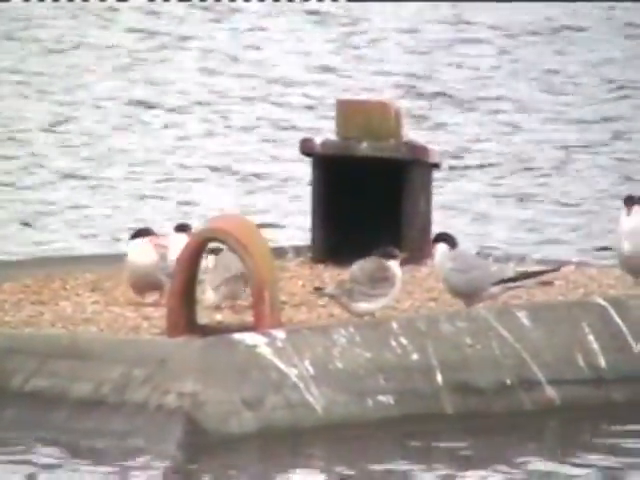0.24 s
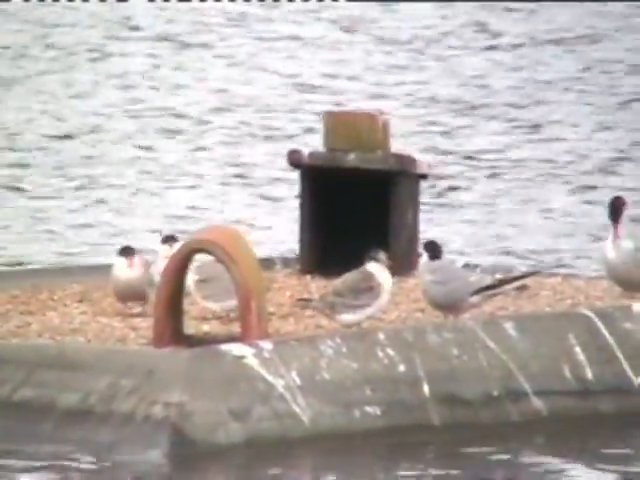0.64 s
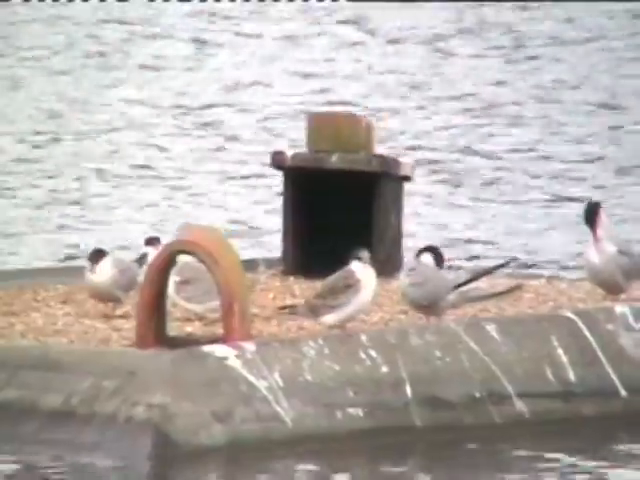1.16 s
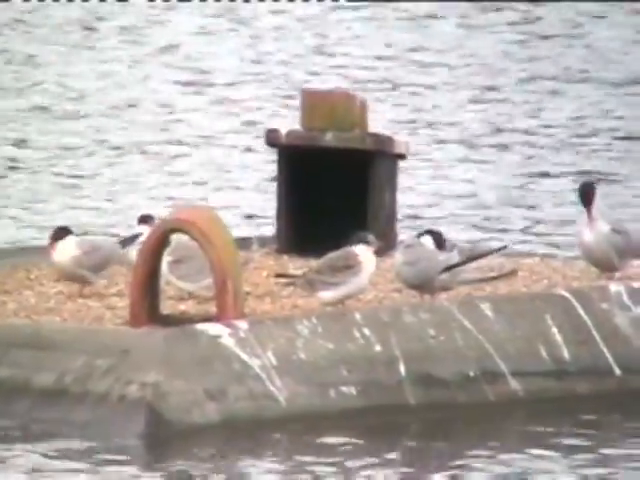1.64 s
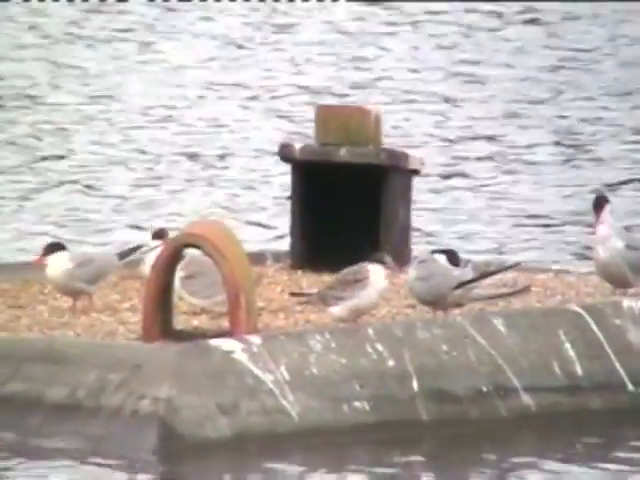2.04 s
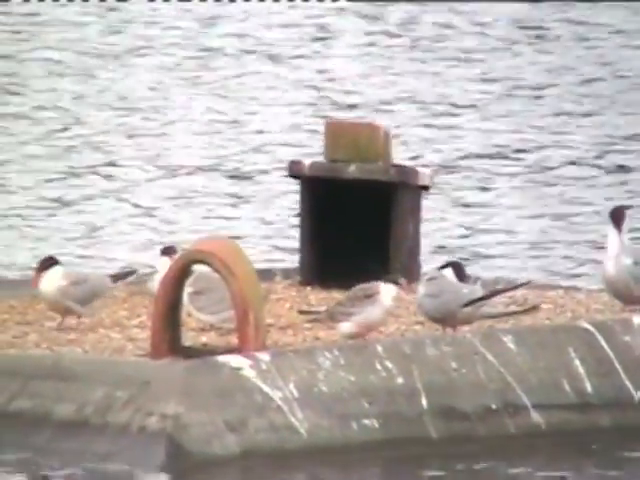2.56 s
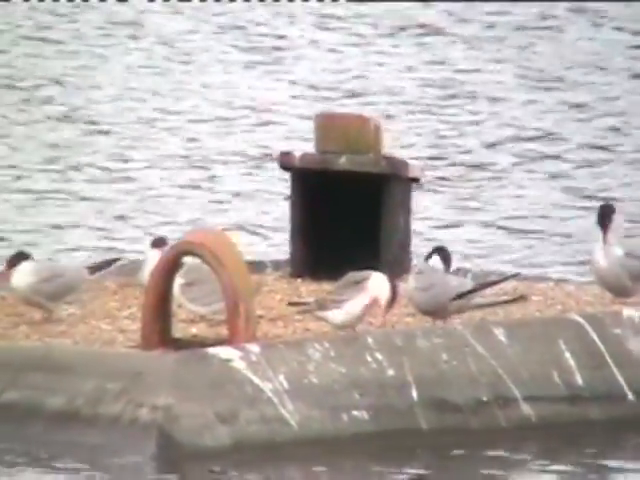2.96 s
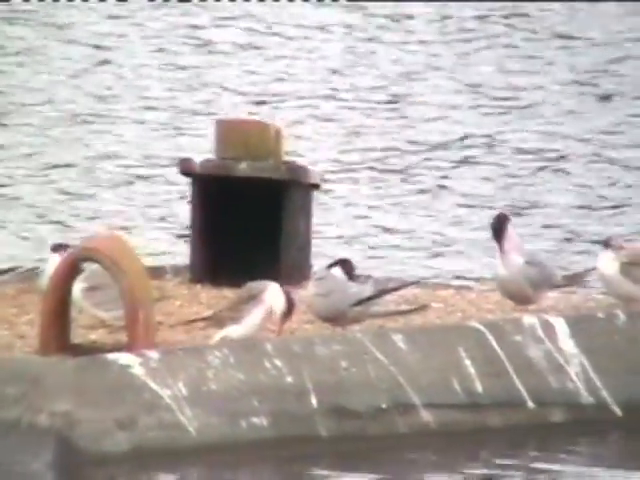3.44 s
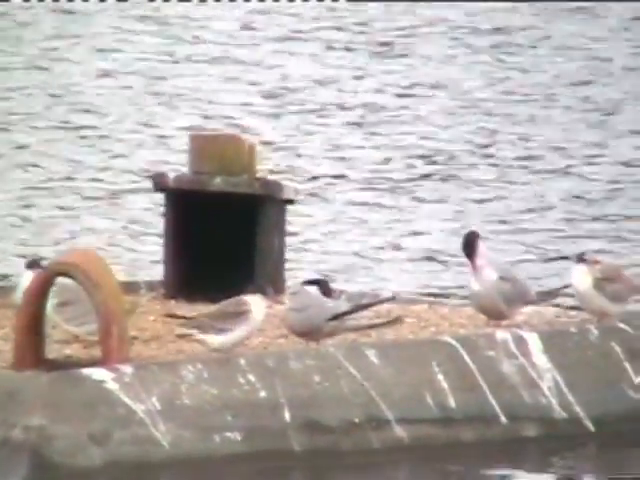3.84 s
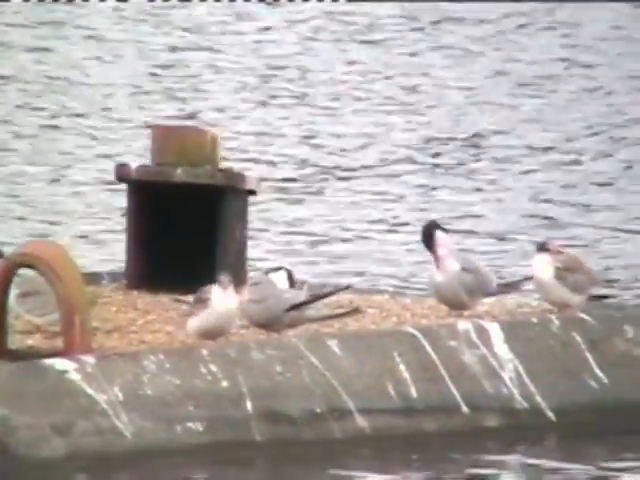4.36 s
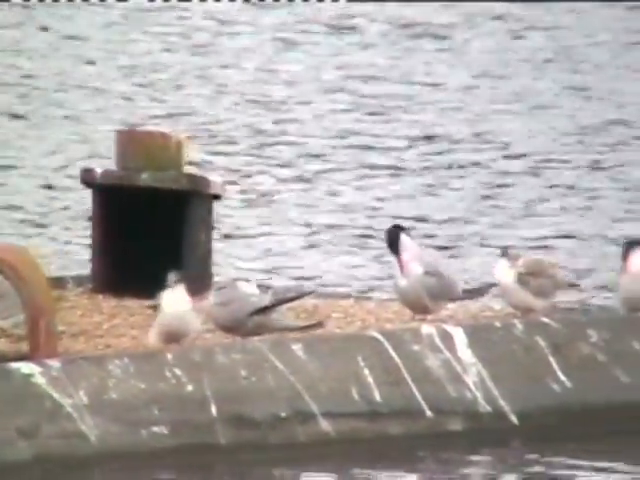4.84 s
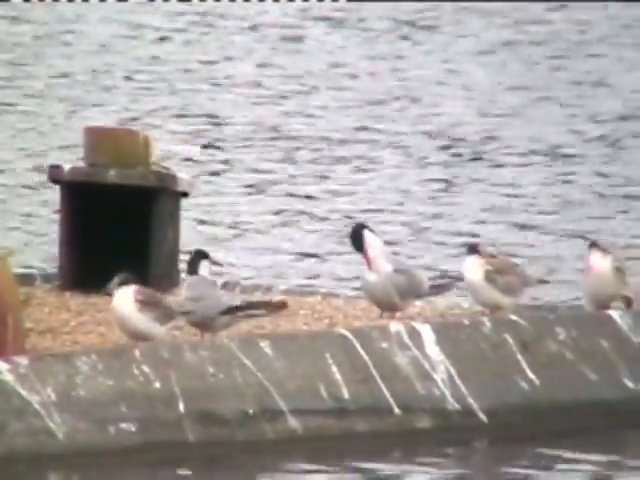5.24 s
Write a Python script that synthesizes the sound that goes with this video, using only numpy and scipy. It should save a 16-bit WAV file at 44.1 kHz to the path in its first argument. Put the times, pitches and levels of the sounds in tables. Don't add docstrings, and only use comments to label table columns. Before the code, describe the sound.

Outdoor seabird calls over continuous hissing wind and a faint high motor whine. Fast buzzy churring opens, with tiny whistles and long falling cries farther off. It thins out to distant rasps, then scolding birds grate over each other, followed by a near trilled call with a rough low ending. More thin whistles and rasps lead to a second similar call at the close. Open water gives only faint scattered returns; close stereo microphones, limited treble.

```python
import sys
import numpy as np
from scipy import signal
from scipy.fft import rfft, irfft, next_fast_len
from scipy.io import wavfile
from scipy.ndimage import uniform_filter1d

SR = 44100
rng = np.random.default_rng(int(sys.argv[2]) if len(sys.argv) > 2 else 0)


def master(y):
    cut = np.clip(np.atleast_2d(y).T, -1, 1)
    pcm = np.round(cut * 32767)
    wavfile.write(sys.argv[1], SR, pcm.astype(np.int16))


def invert_db(level):
    return 10 ** (np.asarray(level, dtype=float) / 20)


N = 242991


def read(points, hz):
    f, value = np.transpose(points)
    return np.interp(np.log(hz + 1), np.log(f + 1), value)


def evened(x):
    return x / np.sqrt(np.mean(x ** 2) + 1e-20)


def add(mix, s, sound):
    part = mix[max(round(s * SR), 0):][:len(sound)]
    part += sound[:len(part)]


def wander(count, span):
    wide = int(span) + 1
    return evened(uniform_filter1d(uniform_filter1d(rng.standard_normal(count), wide), wide))


def wind():
    # (frequency [Hz], density [dB per Hz])
    spectrum = [(18, -72.5), (30, -30.5), (139, -23.5), (197, -14), (307, -6), (361, -4), (415, -7.5),
                (445, -4.5), (700, -5), (1000, -9), (1250, -11), (1500, -13), (1970, -11.5), (2110, -15),
                (2260, -15), (2500, -19.5), (3210, -20), (3700, -20), (4100, -13), (4600, -11.5),
                (4900, -17), (5200, -15.5), (5700, -9.5), (7760, -30.5), (10100, -72), (17100, -120)]
    # (frequency [Hz], port likeness [0-1])
    likeness = [(60, .25), (125, .75), (200, .7), (300, .28), (500, .45), (1000, .78), (2000, .84),
                (4000, .94), (6300, .9), (7000, .5)]
    frames, hz = N // 256 + 5, np.fft.rfftfreq(1024, 1 / SR)
    a, b, c, d, patches = rng.standard_normal((frames, 513, 5)).T
    patches = evened(uniform_filter1d(uniform_filter1d(patches, 12, 0), 14, 1))
    same = np.clip(read(likeness, hz), 0, 1)[:, None]
    left = a + 1j * b
    right = same * left + np.sqrt(1 - same ** 2) * (c + 1j * d)
    z = np.array([left, right]) * invert_db(read(spectrum, hz)[:, None] + .8 * patches)
    hiss = signal.istft(z, nperseg=1024, noverlap=768)[1][:, :N]
    return invert_db(-46.5) * evened(hiss)


def steady_tones(tones, waver_share):
    motor_db = 4.5
    out = np.zeros(N)
    for hz, db in tones:
        turns = np.cumsum(hz * (1 + waver_share * wander(N, 5000))) / SR
        level_db = motor_db + db + 1.5 * wander(N, 3000)
        out += np.sqrt(2) * invert_db(level_db) * np.sin(2 * np.pi * turns)
    return out


def motor():
    # (frequency [Hz], level [dB])
    whine = [(4447, -71.5), (4893, -71), (5216, -69), (5265, -69), (5335, -63), (5356, -65), (5469, -71),
             (5566, -69), (5663, -69), (5706, -75), (5780, -72), (5803, -66), (5862, -71), (5900, -72),
             (5965, -72), (5986, -71), (6132, -75), (6158, -73), (6223, -77), (6261, -74), (6385, -71),
             (6481, -78), (6562, -77), (6955, -80)]
    # (frequency [Hz], level [dB])
    hum = [(2223, -73), (3112, -71)]
    drone = np.array([steady_tones([(208, -76)], .012) for port in range(2)])
    return steady_tones(whine + hum, .0006) + drone


def syrinx(hz, rasp, tones_db):
    rasp_hz = 330
    rasp = np.clip(rasp, 0, 1)
    turns = np.cumsum(hz * (1 + (.004 + .06 * rasp) * wander(len(hz), 60))) / SR
    tone = sum(invert_db(db) * np.sin(2 * np.pi * (k + 1) * turns + k * k) for k, db in enumerate(tones_db))
    beat = np.cumsum(rasp_hz * (1 + .25 * wander(len(hz), 200))) / SR + rng.random()
    chop = 1 - rasp + 2.6 * rasp * np.exp(-(beat % 1) / .25)
    return np.sqrt(2) * tone * chop / np.sqrt(np.mean(chop ** 2))


def cry(rows, trill, tones_db):
    s, *columns = np.transpose(rows)
    t = np.arange(s[0], s[-1], 1 / SR)
    hz, level_db, rasp = (np.interp(t, s, c) for c in columns)
    first, rate, dip, dip_db, last = (*trill, np.inf)[:5]
    beat = ((t - first) * rate) % 1
    trilling = np.clip((last - t) / 0.036 + 1, .1, 1)
    sag = uniform_filter1d(beat ** 9 + .9 * np.exp(-beat / .06), 60)
    sag = trilling * np.where(t < first + .003, .3, 1) * sag
    gap = np.maximum(trilling, .95) * np.cos(np.pi * (beat - .07)) ** 14
    fade = np.clip(np.minimum(t - s[0], s[-1] - t) / .008, 0, 1)
    return s[0], invert_db(level_db - dip_db * gap) * fade * syrinx(hz * (1 - dip * sag), rasp, tones_db)


def phrase(start, length, start_hz, end_hz, level_db, swell, fade, ends_db, scoop, late, rasp):
    rasp_growth, waver_db, waver_s = 0.28, 2.0, .025
    u = np.linspace(0, 1, round(length * SR / 100))
    opening = np.clip(1 - u / swell, 0, 1)
    closing = np.clip(1 - (1 - u) / fade, 0, 1)
    pitch = (start_hz + (end_hz - start_hz) * u ** late) * (1 - scoop * opening)
    effort_db = level_db + ends_db * (opening + closing) + waver_db * wander(len(u), waver_s * SR / 200)
    return np.transpose([start + u * length, pitch, effort_db, rasp + rasp_growth * (1 - rasp) * u])


def babble():
    # (time [s], level [dB])
    course = [(0.0, -54.5), (0.57, -59), (0.66, -64), (1.32, -56), (1.52, -51.5), (1.66, -63.5),
              (2.21, -56.5), (2.38, -65), (2.61, -80), (2.78, -51), (3.0, -54), (3.08, -59), (3.47, -48.5),
              (3.62, -52), (3.95, -58), (4.13, -54.5), (4.26, -55.5), (4.7, -53.5), (4.86, -50), (5.1, -53),
              (5.45, -45.5)]
    # (frequency [Hz], spread [share])
    bands = [(1500, .12), (1850, .1), (3150, .1), (3400, .06), (4350, .06), (4600, .05)]
    out, count = np.zeros(N), 700
    for s, band, place, slope, size in rng.random((count, 5)):
        hz, spread = bands[int(band * len(bands))]
        u = np.linspace(0, 1, round((.03 + .1 * size) * SR))
        pitch = hz * (1 + spread * (2 * place - 1) - .12 * slope * u)
        add(out, s * N / SR, np.sin(np.pi * u) * syrinx(pitch, .7, [0]))
    s, level_db = np.transpose(course)
    return invert_db(np.interp(np.arange(N) / SR, s, level_db)) * evened(out)


def far_rasps():
    # (time [s], length [s], start [Hz], end [Hz], level [dB])
    rasps = [(1.09, .11, 5000, 2800, -52.5), (1.8, .09, 4550, 4250, -55), (2.03, .14, 4000, 4700, -52),
             (2.0, 0.22, 2150, 2200, -56), (1.32, .12, 4443, 3672, -49.5), (1.55, .14, 4295, 3699, -51.5),
             (4.17, .26, 4452, 4340, -50.5), (4.82, .15, 4500, 4520, -51), (4.85, .075, 5100, 5350, -50),
             (4.66, .1, 4400, 4250, -55.5), (5.23, .16, 4343, 4912, -51.5)]
    for row in rasps:
        course = phrase(*row, swell=.25, fade=.5, ends_db=-5, scoop=.02, late=1.05, rasp=.45)
        yield cry(course, (0, 41.5, .03, 9), [0])


def far_cries():
    # (time [s], length [s], start [Hz], end [Hz], level [dB])
    far = [
        (.02, 0.27, 998, 917.5, -49),
        (0.399, 0.345, 931.6, 847, -54.5),
        (1.87, .42, 1018, 836, -50.5),
        (4.114, 0.22, 1016, 966, -47.5),
    ]
    far_tones = [
        [-11, 0.0021, -12, -2.5, -31],
        [-7, 0.0012, -17, -11, -29],
        [-19.5, 0.0041, -12.5, -13.5, -22],
        [-15.5, 0, -16.5, -18, -22],
    ]
    # (time [s], length [s], start [Hz], end [Hz], level [dB])
    falling = [
        (.975, .295, 1031, 926, -50),
        (1.27, .27, 950, 871, -57.5),
        (3.05, 0.17, 981, 949, -52),
    ]
    falling_tones = [-13.5, 0, -18.5, -12.5, -11]
    trill = (50, .01, 6.5)
    for row, tones_db in zip(far, far_tones):
        course = phrase(*row, swell=.2, fade=.2, ends_db=-6, scoop=.06, late=2.2, rasp=.2)
        yield cry(course, (row[0], *trill), tones_db)
    for row in falling:
        course = phrase(*row, swell=.08, fade=.35, ends_db=-4, scoop=.005, late=.85, rasp=.2)
        yield cry(course, (row[0], *trill), falling_tones)


def peep(s, length, start_hz, end_hz, level_db):
    u = np.linspace(0, 1, round(length * SR))
    flutter = invert_db(1.8 * wander(len(u), 200))
    sound = syrinx(end_hz + (start_hz - end_hz) * (1 - u) ** 1.5, .05, [0])
    return s, invert_db(level_db) * flutter * signal.windows.tukey(len(u), .4) * sound


def whistles():
    # (time [s], length [s], start [Hz], end [Hz], level [dB])
    peeps = [(2.272, .038, 4000, 3570, -52), (.998, .045, 4250, 3400, -52), (.19, .058, 1120, 1430, -52),
             (.24, .042, 1430, 1230, -54), (.305, .03, 1330, 1500, -53), (.33, .05, 1480, 1290, -53),
             (.38, .11, 1300, 1170, -57), (.95, .05, 4950, 5050, -60), (.942, .022, 4500, 3800, -50),
             (.958, .02, 3800, 3300, -50), (.922, .018, 4400, 4150, -52), (4.912, .025, 1620, 1500, -53),
             (4.85, .018, 1560, 1540, -52), (1.43, .09, 3350, 3200, -59), (.29, .035, 1780, 2220, -52),
             (.325, .022, 1950, 2200, -54), (.345, .03, 2180, 1950, -55), (.315, .02, 1750, 1740, -50),
             (0, .022, 2150, 2140, -55), (4.58, .05, 3800, 3300, -59), (4.45, .03, 3800, 3500, -60),
             (5.085, .03, 3700, 3500, -58), (4.22, .1, 4500, 4350, -59), (5.27, .11, 4450, 5150, -60),
             (4.62, .2, 4450, 4350, -59), (3.69, .13, 3800, 3600, -62), (1.27, .08, 4700, 4050, -57),
             (1.5, .12, 4500, 3750, -57), (2.385, .022, 3750, 3400, -58), (.98, .05, 4020, 4080, -54),
             (.165, .022, 1220, 1200, -54), (.8, .02, 3400, 4000, -58), (3.5, .016, 2760, 2720, -51),
             (3.52, .02, 2750, 2690, -50), (3.545, .013, 2700, 2740, -51), (3.455, .016, 2720, 2700, -52),
             (3.49, .09, 1820, 1720, -56), (3.76, .1, 1800, 1730, -59),
             (1.05, .06, 5000, 4920, -54), (1.1, .075, 4950, 4740, -50), (1.17, .1, 4760, 4680, -56),
             (1.0, .03, 4150, 4120, -52), (1.04, .06, 4050, 3800, -56), (2.305, .022, 3570, 3720, -54),
             (1.9, .1, 2980, 3020, -57), (1.88, .13, 3920, 4050, -60), (1.7, .07, 4420, 4480, -56),
             (.575, .05, 1900, 1720, -53), (.69, .035, 1720, 1680, -53), (4.86, .055, 1900, 1840, -52)]
    # (time [s], level [dB])
    yelps = [(0.164, -50.5), (.188, -50), (.211, -50.5), (.233, -46), (0.265, -47), (0.283, -51)]
    for row in peeps:
        yield peep(*row)
    for s, level_db in yelps:
        yield peep(s, .015, 1450, 2000, level_db)


def scolds():
    # (time [s], length [s], start [Hz], end [Hz], level [dB])
    scold_rows = [
        (2.7, 0.21, 855, 820, -53),
        (4.805, 0.11, 950, 810, -50.5),
        (1.96, .21, 800, 778, -57),
        (2.31, 0.1, 580, 640, -54),
        (2.915, .12, 1040, 985, -47.5),
    ]
    # (trill phase point [s], dips per s [Hz], pitch dip [share], level dip [dB])
    trills = [(3.3, 44, 0.021, 15), (6.1, 80, 0.018, 39), (9.7, 130, 0.012, 4.4), (1.1, 61, 0.02, 4.8),
              (2.94, 42, 0.018, 6)]
    scold_tones = [
        [-10.5, -11, -14, 1, 5, -5.5],
        [-4.5, 3, -6.5, 0, 1.5, -1.5],
        [-7.5, -2.5, -1, -4, -2, -1.5],
        [-18, -12.5, 3.5, -14, -7, -1.5],
        [-18, 1, -22, -5, -20, -25.5],
    ]
    shape = dict(swell=.3, fade=.4, ends_db=-5, scoop=-.02, late=1.3, rasp=.5)
    for row, trill, tones_db in zip(scold_rows, trills, scold_tones):
        yield cry(phrase(*row, **shape), trill, tones_db)
    answer = phrase(2.71, length=.21, start_hz=960, end_hz=885, level_db=-48, **shape)
    yield cry(answer, (1, 80, 0.019, 36), [-23, 3, -5.5, -27])
    beads = phrase(2.875, length=.14, start_hz=3320, end_hz=2780, level_db=-45.5,
                   swell=.6, fade=.1, ends_db=-8, scoop=.002, late=.7, rasp=.25)
    yield cry(beads, (2.938, 39, .03, 26), [0])


def churr(s, level_db, hz, high_db, bend):
    length_s, fall_share, half_pitch_hz = .024, .135, 575
    octave_db, half_db = -9.5, -7
    rasp = .3 + .14 * s
    u = np.linspace(0, 1, round(length_s * SR))
    shape = np.minimum(u / .06, 1) * np.clip((1 - u) / .35, 0, 1)
    order = round(hz / half_pitch_hz)
    k = np.arange(1, 10)
    envelope = [(600, -40), (1150, -18), (2300, high_db + octave_db), (hz, 0), (4600, high_db), (5400, -18)]
    tones_db = read(envelope, hz / order * k) + half_db * (k % 2) * (k != order)
    glide = .3 - u ** 2 if bend > 0 else (1 - u) ** 2 - .3
    pitch = hz / order * (1 + bend * fall_share * glide)
    pitch = pitch * (1 - .08 * np.exp(-u / .08))
    return s - .002, invert_db(level_db - 4) * shape * syrinx(pitch, rasp, tones_db)


def young_bird():
    # (time [s], level [dB], loudest tone [Hz], tone near 4.6 kHz [dB], droop, below 0 a climb [ratio])
    syllables = [(0.0024, -38, 4318, 0.5, .6), (0.14, -43, 4390, -5, -.9), (0.163, -44, 2390, 0.5, 0.5),
                 (0.1908, -42.5, 3990, 3.5, .3), (0.2241, -43, 3310, 5, 0.3),
                 (0.2482, -45, 4110, -10, 0.54), (0.3586, -60.5, 4500, 5, 0.32),
                 (0.3897, -39, 3930, -15.5, 0.84), (0.4233, -42, 3750, 3.5, -0.55),
                 (0.442, -44.5, 4200, -3, .6), (0.4593, -40.5, 3512, 0.5, 0.45),
                 (0.487, -48.5, 3340, 11, .15), (0.5164, -49, 3360, 13, .7), (0.607, -40, 4050, -9, -.7),
                 (0.639, -37, 3666, -8.5, -.4), (0.675, -39, 3480, -2.5, -0.072),
                 (0.7058, -40.5, 3420, -6, 1.2), (0.8521, -41.5, 4354, -14.5, -1.6),
                 (0.8838, -41, 4030, -15.5, -1.5), (0.9195, -45.5, 4260, 2, -0.99),
                 (0.9497, -48, 3930, -3, 2.1), (1.066, -55.5, 3980, -6, .6),
                 (1.102, -45.5, 4560, -9, -0.66), (1.1342, -52.5, 4080, -2, -.5),
                 (1.168, -45, 4166, -10.5, 0.94), (1.3406, -55, 3880, 11, .9),
                 (1.3673, -47.5, 4057, 3.5, .9), (1.3964, -45.5, 4190, -1, .9),
                 (1.5762, -61, 3910, 17.5, .9), (1.6053, -47.5, 4110, 0, .9),
                 (1.6426, -44.5, 4045, -4.5, 0.77)]
    for row in syllables:
        yield churr(*row)


def trilled(start, break_s, hz, sag_s, level_db):
    rise_s, low_s, scoop, rasp = .03, 0.066, .11, 0.24
    break_hz, low_hz, low_end_hz = 1594, 1340, 1269
    s = [start, start + rise_s, break_s - sag_s, break_s - .002, break_s + 0.002, break_s + low_s]
    pitch = [hz * (1 - scoop), hz, hz, break_hz, low_hz, low_end_hz]
    effort_db = level_db + np.array([-2, 0, 0, 3.5, 0, -8])
    return np.transpose([s, pitch, effort_db, np.full(len(s), rasp)])


def near_cries():
    # (time [s], voice break [s], held pitch [Hz], sag before the break [s], level [dB])
    near = [
        (3.163, 3.344, 1788, 0.073, -43),
        (5.18, 5.383, 1755, 0.079, -42.5),
    ]
    # (first dip [s], dips per s [Hz], pitch dip [share], level dip [dB], last dip [s])
    near_trill = [
        (3.186, 33, .18, 5, 3.31),
        (5.2, 33, .12, 8, 5.325),
    ]
    near_tones = [-4, 1.5, -20, -17.5, -16]
    # (time [s], length [s], start [Hz], end [Hz], level [dB])
    ends = [
        (3.397, .08, 632, 622, -48.5),
        (5.427, 0.06, 643, 624, -48.5),
    ]
    # (first dip [s], dips per s [Hz], pitch dip [share], level dip [dB])
    end_trill = [
        (3.4, 36.6, .03, 13),
        (5.413, 33.8, 0.027, 7.3),
    ]
    end_tones = [-30.5, -5, -8.5, -4.5, 2, -5, -10, -17]
    for row, trill in zip(near, near_trill):
        yield cry(trilled(*row), trill, near_tones)
    for row, trill in zip(ends, end_trill):
        course = phrase(*row, swell=.2, fade=.2, ends_db=-3, scoop=.02, late=1.2, rasp=.75)
        yield cry(course, trill, end_tones)


def water(x, t60=0.62):
    t = np.arange(round(.3 * SR)) / SR
    sparse = rng.choice([-1., 1.], (3, len(t))) * (rng.random((3, len(t))) < .05)
    taps = sparse * invert_db(-60 * t / t60) * (t > .004)
    taps = taps[0] + 0.75 * taps[1:]
    return signal.fftconvolve(x[None], taps / np.linalg.norm(taps[0]), axes=1)[:, :N]


def scene():
    birds = babble()
    for voices in (far_rasps, far_cries, whistles, scolds, young_bird, near_cries):
        for s, sound in voices():
            add(birds, s, sound)
    birds = signal.sosfilt(signal.butter(4, 700, "high", fs=SR, output="sos"), birds)
    return birds + invert_db(-12) * water(birds) + motor() + wind()


def band_limit(x):
    return signal.sosfilt(signal.butter(12, 7910, fs=SR, output="sos"), x)


def record(dry):
    # (frequency [Hz], left lead [rad])
    port_phase = [(0, 0), (60, 3), (260, 2.9), (690, .5), (1290, -.4), (2070, -.4), (3100, -.7), (3880, -1),
                  (5340, -1.6), (6630, -1.9), (7490, -3)]
    # (frequency [Hz], left minus right [dB])
    port_balance = [(60, -1), (250, -1.6), (1000, -.7), (3000, -1.2), (4300, -3), (6000, -3), (7000, -1.5),
                    (8000, 1)]
    edge_hz, offset = 7800, -.0017
    size = next_fast_len(N + 4096)
    hz = np.fft.rfftfreq(size, 1 / SR)
    f, lead = np.transpose(port_phase)
    half = np.exp(.5j * np.interp(hz, f, np.unwrap(lead))) * invert_db(.5 * read(port_balance, hz))
    edge = 1 / (1 + (hz / edge_hz) ** 60)
    ports = irfft(rfft(dry, size) * np.array([half, 1 / half]) * edge, size)[:, :N]
    return band_limit(ports + offset)


dry = scene()
out = record(dry)
master(out)
```